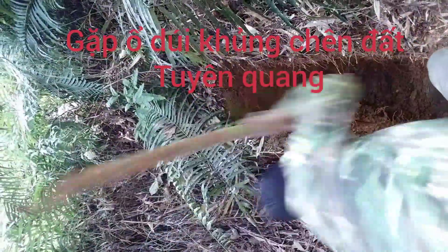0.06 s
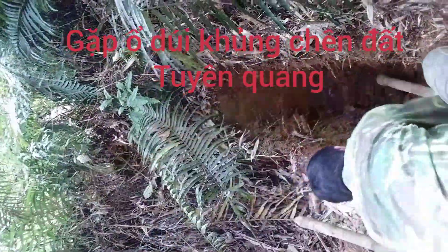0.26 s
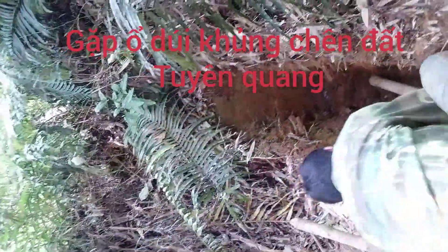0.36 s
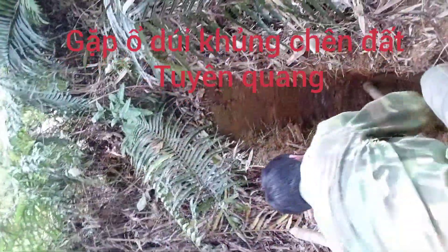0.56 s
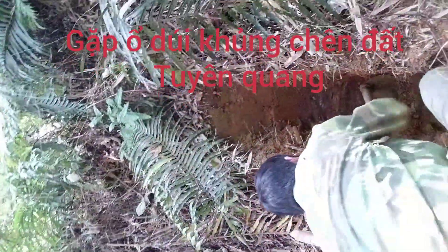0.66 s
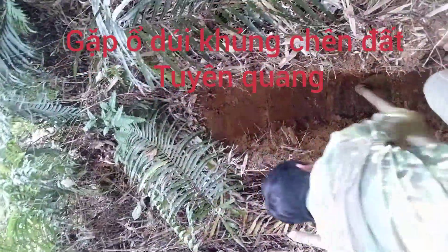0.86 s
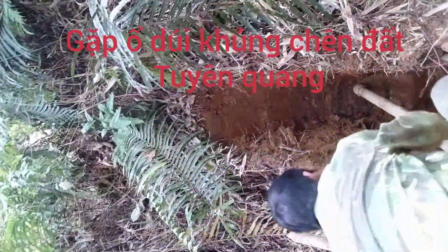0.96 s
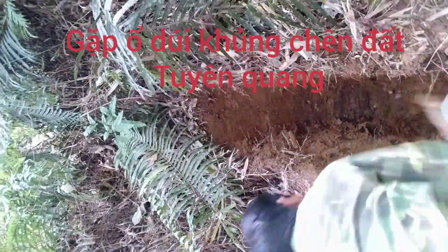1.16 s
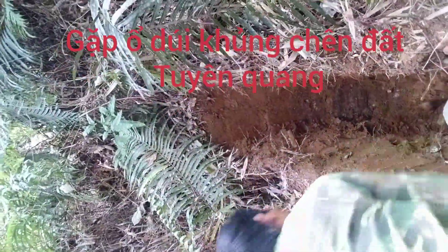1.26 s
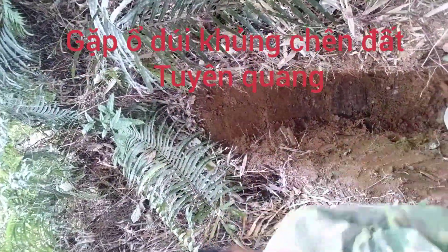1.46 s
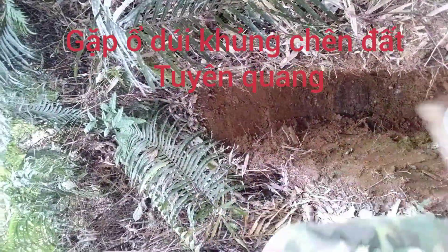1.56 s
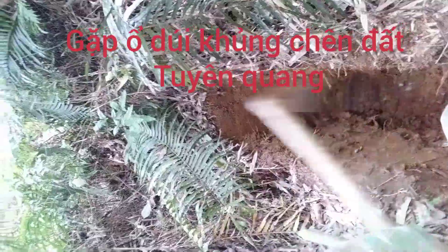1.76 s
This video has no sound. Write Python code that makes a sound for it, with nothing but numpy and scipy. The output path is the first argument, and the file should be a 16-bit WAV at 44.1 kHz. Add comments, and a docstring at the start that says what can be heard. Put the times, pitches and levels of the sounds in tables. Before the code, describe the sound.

A hoe chops twice into damp soil close by, first with a sharp crack, thud and snapping roots, then more softly. Between the blows, crumbs of earth fall and the blade faintly scrapes and clinks over a quiet forest hiss.

```python
"""On a forest floor, a hoe chops twice into damp, rooty soil close by.
Each blow is a crack of the edge, a thud of the ground and a gritty crunch that rings the blade;
loose earth spills after it. Around the blows roots snap, the hoe drags through soil, crumbs drop,
the steel tinks and the loose head clanks on its handle, all over a quiet forest hiss."""
import sys
import numpy as np
from scipy import signal
from scipy.fft import rfft, irfft
from scipy.io import wavfile

SR = 44100
rng = np.random.default_rng(int(sys.argv[2]) if len(sys.argv) > 2 else 0)


def dump_mix(stems):
    """Bounce the given channels to the path in sys.argv[1] as a 16-bit WAV at rate SR."""
    frames = np.atleast_2d(stems).T  # one column per channel
    limited = np.clip(frames, -1, 1)  # hard clip at full scale
    pcm = np.round(limited * 32767).astype(np.int16)
    wavfile.write(sys.argv[1], SR, pcm)


N = 79380
T = np.arange(N) / SR
ATTACK_S = 0.0012  # how fast a hit gets loud
# A fade time (t60) is how long a sound takes to drop by 60 dB. All levels are relative.

# The two chops. Each row: start in seconds, crack level in dB, crack fade and hold in seconds,
# crunch level in dB, crunch fade in seconds, levels in dB of the spill, clod, blade, thud and knock,
# knock fade in seconds.
CHOPS = [(0.2370, -13, .033, 0.0021, -18.5, .19, -44, -15.5, -23.5, -24.5, -14.5, 0.13),
         (1.2570, -18.5, 0.028, 0.00095, -31, 0.14, -63, -37.5, -36, -46, -24.5, 0.084)]
# The tones of the struck blade, the ground's deep thud and its higher knock.
# Each row: pitch in Hz, level in dB, fade time in seconds before any damping or scaling.
BLADE_TONES = [(652, -9, 0.17), (1068, 2, .1), (1290, -0.5, 0.03), (1396, -4, .08), (1900, -11, 0.3),
               (2663, -0.5, .15), (3673, 0, .14), (4690, 1, .07), (5400, -5, 0.089), (5730, 0.5, 0.24),
               (6450, -8, .11), (7420, -10, 0.13)]
THUD_TONES = [(87.76, 0, .4), (146, 1, 0.23)]
KNOCK_TONES = [(273.5, -1, .1), (344.5, 0.98, 0.066)]
# The tone colour of the edge's crack, the crunching grit and a hollow clod of earth breaking.
# Each row: frequency in Hz, level in dB.
CRACK_COLOUR = [(60, -23.5), (350, -3.5), (500, -19), (800, -11.5), (1050, -11), (1400, -4.5),
                (1800, -12.5), (2700, -8), (3900, -5.5), (4900, -5.5), (6300, -5), (7800, -17),
                (9200, -21.5), (11000, -13), (16000, -15.5)]
CRUNCH_COLOUR = [(60, -10), (350, -4), (480, -14.5), (800, -14.5), (1150, -13.5), (1700, -9.5), (2600, -3),
                 (3100, -6.5), (3700, -3), (5600, -2), (7700, -6.5), (9200, -20), (10800, -13),
                 (16000, -13.5)]
CLOD_COLOUR = [(200, -21.5), (520, -20), (790, -6.5), (920, -11.5), (1080, -3), (1400, 0.5), (1700, -16.5),
               (2600, -16.5), (8000, -32.5), (16000, -42)]

def hoe_blows():
    """The edge cracks in, a clod breaks, the ground thuds, grit rubs the blade and earth spills."""
    lead_in_s, crunch_rise_s = 0.004, 0.012
    crack = crunch = clod = body = 0
    for (start, crack_db, crack_t60, hold, crunch_db, crunch_t60,
         spill_db, clod_db, blade_db, thud_db, knock_db, knock_t60) in CHOPS:
        # A faint, short swell of noise leads into each crack.
        lead_in = undb(-12.5) * burst(start - lead_in_s, lead_in_s, crack_t60)
        crack += undb(crack_db) * (lead_in + burst(start, ATTACK_S, crack_t60, hold))
        spill = burst(start, crunch_rise_s, t60=0.55)
        crunch += undb(crunch_db) * burst(start, crunch_rise_s, crunch_t60) + undb(spill_db) * spill
        clod += undb(clod_db) * (burst(start, ATTACK_S, t60=0.048, hold=hold) + undb(-34) * spill)
        sunk = start + ATTACK_S
        knock = undb(-10) * noise_band(200, 400) * burst(start, ATTACK_S, knock_t60)
        knock += undb(-2.5) * ring(sunk, KNOCK_TONES, sustain=knock_t60 / 0.12)
        # The ground shakes while the blade sinks, then stops quickly.
        thud = undb(1) * ring(sunk, THUD_TONES) * burst(start, rise=0.014, t60=0.061, hold=0.04)
        blade = ring(sunk, BLADE_TONES, scatter_db=-2)
        body += undb(blade_db) * blade + undb(thud_db) * thud + undb(knock_db) * knock
    # Rubbing grit keeps the muffled blade ringing.
    muffled_blade = ring(0, BLADE_TONES, sustain=0.4)
    rub = undb(-8) * resonate(crunch * grains(spread_db=-0.5), muffled_blade)
    crack = colour(crack * grains(spread_db=1), CRACK_COLOUR)
    crunch = colour(crunch * grains(spread_db=3), CRUNCH_COLOUR)
    clod = colour(clod * grains(spread_db=-1.5), CLOD_COLOUR)
    return crack + crunch + clod + rub + body


# Roots and clods giving way.
# Each row: start in seconds, tear level in dB, tear fade in seconds, thump level in dB.
ROOT_SNAPS = [(0.2504, -20.5, .025, -7), (0.2609, -25, 0.034, -14), (0.273, -25, 0.038, -25.5),
              (0.738, -52.5, 0.04, -69), (1.004, -56, 0.04, -74), (1.167, -38, 0.076, -68.5),
              (1.207, -55.5, 0.15, -54), (1.276, -34.5, 0.031, -61), (1.323, -52, .025, -70)]
# The tone colour of a tearing root. Each row: frequency in Hz, level in dB.
ROOT_COLOUR = [(100, -22.5), (400, -14), (800, -22.5), (1200, -12), (1470, 0), (1800, -16.5), (2300, -4.5),
               (2750, -11.5), (3700, 1.5), (4700, -7), (5600, -2.5), (7700, -11), (9000, -26), (12000, -20),
               (16000, -23)]

def snapping_roots():
    """Roots tear in a quick run of tiny breaks and thump the soil around them."""
    soil_tones = [(290, -1, 0.022), (150, -7, 0.025)]  # Hz, dB, fade in seconds
    tear = sum(undb(db) * burst(start, ATTACK_S, t60, hold=0.0015) for start, db, t60, _ in ROOT_SNAPS)
    thump = sum(undb(db) * ring(start, soil_tones) for start, _, _, db in ROOT_SNAPS)
    return colour(tear * grains(spread_db=4.5), ROOT_COLOUR) + undb(-3) * thump


# Light touches on the steel. Each row: start in seconds, ring level in dB, tick level in dB,
# fade time as a share of the free ring's.
STEEL_TOUCHES = [(0.018, -58, -33, 0.59), (0.053, -34, -34, 0.57), (0.07, -42, -63, .9),
                 (0.094, -41, -54, 0.77), (0.101, -44, -44, 0.87), (0.175, -58, -48, 0.74),
                 (0.186, -39, -41.5, 0.77), (0.225, -46.5, -46.5, 1), (0.378, -43, -49, 0.29),
                 (0.853, -76, -74, .4), (0.934, -56, -58, 0.36), (1.05, -79.5, -68.5, 0.33),
                 (1.083, -62, -66, 0.48), (1.297, -55, -52, 0.37), (1.366, -54, -50, .4),
                 (1.589, -58, -64, .6)]
# The high tones of freely ringing steel. Each row: pitch in Hz, level in dB, fade time in seconds.
STEEL_TONES = [(4560, -18.5, .18), (5200, -15, .14), (5880, -7, 0.079), (7100, -7.5, .27), (7294, -6, 0.1),
               (7590, -7, .13), (10200, -10, .11), (12260, -3.5, .13), (13380, 2.5, .09), (14860, -12, .11)]
# The tone colour of dry grit and leaves, here and in the drags. Each row: frequency in Hz, level in dB.
GRIT_COLOUR = [(100, -28), (1500, -22.5), (3500, -8.5), (5800, -0.5), (7500, -3.5), (9000, -15),
               (10500, -3), (13000, -0.5), (16000, -2.5)]

def steel_tinks():
    """Light sliding touches on the steel make a gritty tick and a thin, uneven ring."""
    rise_s, detune = 0.003, 0.0054
    ticks = rings = 0
    for start, ring_db, tick_db, share in STEEL_TOUCHES:
        ticks += undb(tick_db) * burst(start, ATTACK_S, t60=0.019)
        tones = np.array(STEEL_TONES)
        tones[:, 0] *= 1 + detune * rng.standard_normal(len(tones))  # each touch bends the pitch
        build_up = np.clip((T - start) / rise_s, 0, 1)
        rings += undb(ring_db) * ring(start, tones, scatter_db=1.5, sustain=share) * build_up
    return colour(ticks * grains(spread_db=4.5), GRIT_COLOUR) + rings * waver()


# Knocks of the loose hoe head. Each row: start in seconds, level in dB.
HEAD_KNOCKS = [(1.168, -41.5), (1.274, -45), (1.3, -50), (1.326, -45), (1.371, -54), (1.59, -63.5)]
# The tones of the head on its handle. Each row: pitch in Hz, level in dB, fade time in seconds.
HEAD_TONES = [(1490, -4.5, 0.078), (2400, -20, 0.079), (4300, -5.5, 0.097), (5540, 7.5, 0.064),
              (5890, -1, 0.044), (6670, -16, 0.064), (7730, -6, 0.065)]

def clanking_head():
    """The loose steel head knocks and rattles on its handle."""
    clanks = sum(undb(db) * ring(start, HEAD_TONES, scatter_db=9.5) for start, db in HEAD_KNOCKS)
    return clanks * waver()


# Crumbs of earth landing. Each row: start in seconds, level in dB.
CRUMB_FALLS = [(0.4565, -56.5), (0.488, -58), (0.526, -59.5), (0.5611, -52), (0.582, -59.5), (0.607, -65),
               (0.662, -67), (0.879, -63.5), (0.916, -58.5)]
# Drags of the hoe. Each row: start and length in seconds, level in dB, grit in dB above that level.
HOE_DRAGS = [(0.0, .15, -68, 11), (0.172, .055, -63, 7), (0.452, .062, -55, -20), (0.556, .05, -61, -14),
             (0.908, .056, -58, -8)]
# The tone colour of loose soil. Each row: frequency in Hz, level in dB.
SOIL_COLOUR = [(40, -31), (150, -17.5), (380, -3.5), (800, -13.5), (1080, 0), (1320, 2), (1750, -13),
               (2700, -8), (3600, -10), (5300, -11.5), (7400, -18), (9000, -34.5), (12000, -27.5),
               (16000, -29)]

def loose_earth():
    """Crumbs patter down and the blade drags through soil and dry grit."""
    soil = sum(undb(db) * burst(start, ATTACK_S, t60=0.059, hold=0.0017) for start, db in CRUMB_FALLS)
    grit = 0
    for start, length, db, grit_db in HOE_DRAGS:
        stroke = undb(db) * np.sin(np.pi * np.clip((T - start) / length, 0, 1))
        soil += stroke
        grit += undb(grit_db) * stroke
    soil = colour(soil * grains(spread_db=4), SOIL_COLOUR)
    return soil + colour(grit * grains(spread_db=5), GRIT_COLOUR)


def downswing():
    """The first swing of the hoe makes a low rustle."""
    return undb(-64.5) * noise_band(44, 264) * burst(0, rise=0.074, t60=0.093, hold=0.2417)


# How the forest hiss rises and falls. Each row: time in seconds, level change in dB.
HISS_CHANGES = [(0, 15.5), (0.4, 8), (0.65, 3), (0.82, -0.5), (1.1, 2.5), (1.4, 4.5), (1.8, 3)]
# The tone colour of the hiss. Each row: frequency in Hz, level in dB.
HISS_COLOUR = [(30, -19), (90, -2), (200, -9), (280, -12.5), (380, -7.5), (560, -11), (900, -9.5),
               (1430, -9.5), (2300, -12.5), (3200, -10.5), (4800, -7.5), (5800, -7), (7500, -12.5),
               (8800, -26), (10500, -20), (13500, -12), (16000, -10.5)]

def forest_hiss():
    """The forest hisses faintly, and its level wanders a little."""
    times = np.linspace(0, T[-1], num=30)
    wander_db = -0.5 * np.interp(T, times, rng.standard_normal(len(times)))
    level_db = -70.5 + np.interp(T, *np.array(HISS_CHANGES).T) + wander_db
    return undb(level_db) * colour(grains(spread_db=1.5), HISS_COLOUR)


def undb(db):
    """Turn decibels into a number to multiply by."""
    return 10 ** (np.asarray(db) / 20)


def unit(x):
    """Scale to an average strength (rms) of 1."""
    return x / np.sqrt(np.mean(x ** 2))


def colour(x, points):
    """Filter a sound along (Hz, dB) points; white noise keeps its power."""
    hz, db = np.array(points).T
    size = 4096
    bin_hz = np.arange(size // 2 + 1) * SR / size
    gain = unit(undb(np.interp(np.log(bin_hz + 1), np.log(hz), db)))
    # Build the filter so that nothing sounds before the hit that causes it.
    cepstrum = irfft(np.log(gain))
    cepstrum[1:size // 2] *= 2
    cepstrum[size // 2 + 1:] = 0
    return signal.fftconvolve(x, irfft(np.exp(rfft(cepstrum))))[:N]


def noise_band(low_hz, high_hz):
    """Noise between two frequencies."""
    bandpass = signal.butter(2, (low_hz, high_hz), "band", fs=SR, output="sos")
    return unit(signal.sosfilt(bandpass, rng.standard_normal(N)))


def grains(spread_db, size=24):
    """Many tiny breaks: half-millisecond bits of noise, some stronger than others."""
    strength = undb(spread_db * np.clip(rng.standard_normal(N // size + 1), -2, 2))
    return unit(np.repeat(strength, size)[:N] * rng.standard_normal(N))


def burst(start, rise, t60, hold=0):
    """A loudness shape that rises, holds and fades; all times are in seconds."""
    age = T - start
    fade = np.exp(-np.log(1000) * np.maximum(age - rise - hold, 0) / t60)
    return np.clip(age / rise, 0, 1) * fade


def ring(start, tones, scatter_db=0, sustain=1):
    """Tones struck together; scatter_db varies their levels and sustain scales their fade times."""
    hz, db, t60 = np.array(tones).T[:, :, None]
    gain = undb(db + scatter_db * rng.standard_normal(db.shape))
    age = T[T >= start] - start
    fade = np.exp(-np.log(1000) * age / (t60 * sustain))
    wave = (gain * np.sin(2 * np.pi * hz * age) * fade).sum(0)
    return np.pad(wave, (N - len(age), 0)) / np.sqrt((gain ** 2).sum() / 2)


def resonate(x, response):
    """Make every moment of a sound set off the given ring or echo."""
    return signal.fftconvolve(x, response / np.linalg.norm(response))[:N]


def waver(depth=0.35, rate_hz=159):
    """The uneven loudness of a ring that rubs and rattles."""
    times = np.arange(0, T[-1] + 0.1, 1 / rate_hz)
    wobble = rng.standard_normal(4096)[:len(times)]
    return 1 + depth * np.interp(T, times, wobble)


def scene():
    """All sources, with a weak echo from the earth bank and plants; only the treble is slightly wide."""
    digging = hoe_blows() + snapping_roots() + loose_earth() + steel_tinks() + clanking_head()
    echo_tail = rng.standard_normal(N) * burst(0.012, rise=0.005, t60=0.073)
    mid = digging + undb(-20.5) * resonate(digging, echo_tail) + downswing() + forest_hiss()
    treble = signal.sosfilt(signal.butter(2, 6000, "high", fs=SR, output="sos"), mid)
    side = undb(-34) * np.pad(treble, (20, 0))[:N]  # 20 samples late
    return np.array([mid + side, mid - side])


def record(dry):
    """The microphone loses the deepest bass and the highest treble."""
    bass_cut = signal.butter(2, 32, "high", fs=SR, output="sos")
    treble_cut = signal.ellip(10, 0.2, 80, 15900, fs=SR, output="sos")
    return signal.sosfilt(treble_cut, np.clip(signal.sosfilt(bass_cut, dry), -1, 1))


dry = scene()
out = record(dry)
dump_mix(out)
```